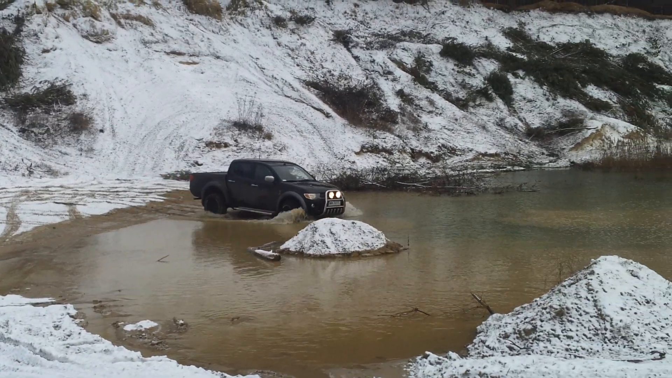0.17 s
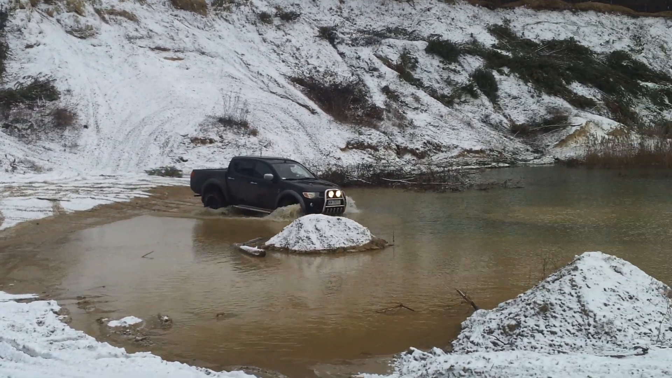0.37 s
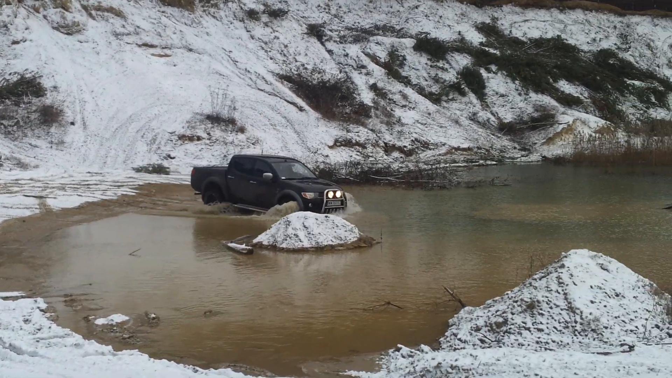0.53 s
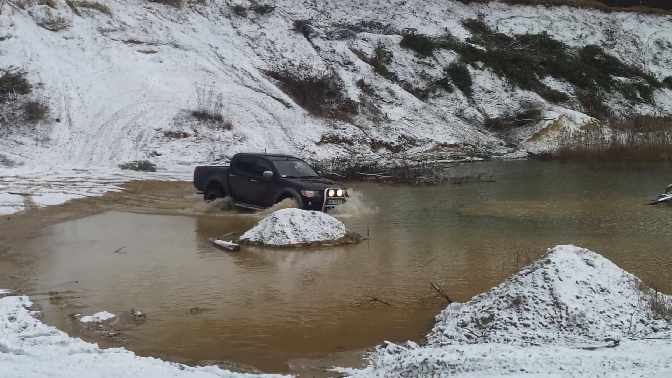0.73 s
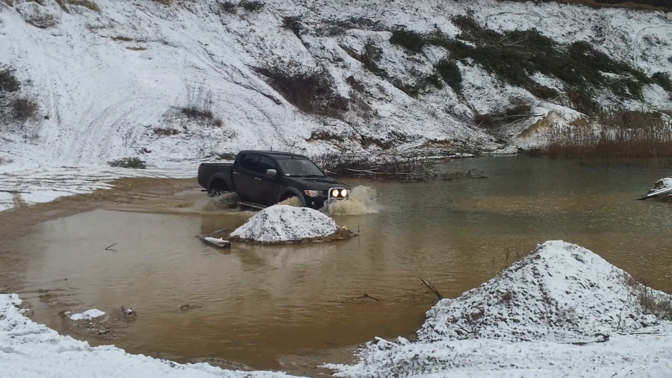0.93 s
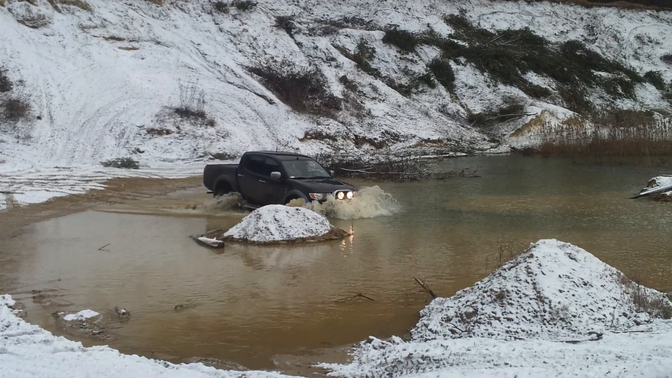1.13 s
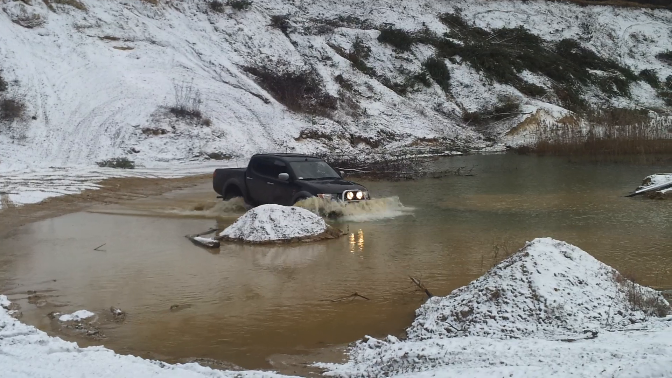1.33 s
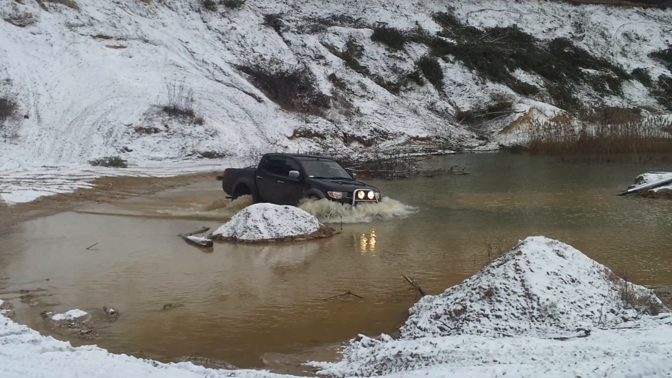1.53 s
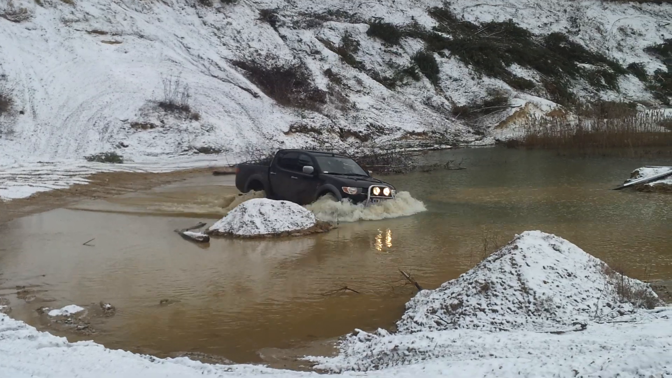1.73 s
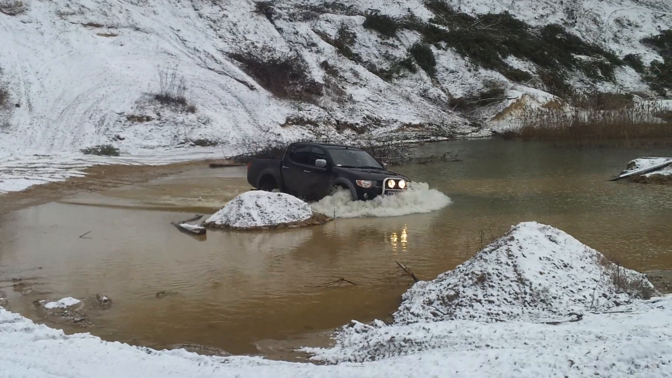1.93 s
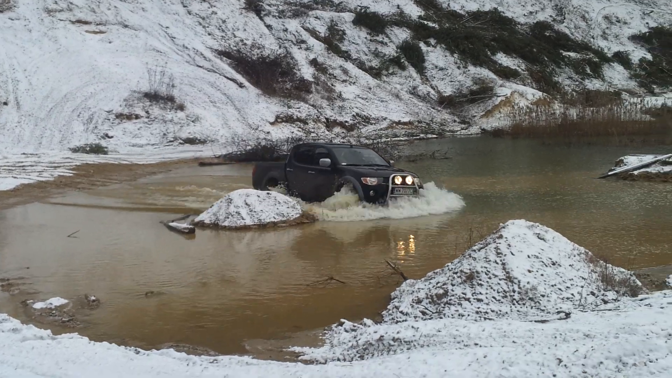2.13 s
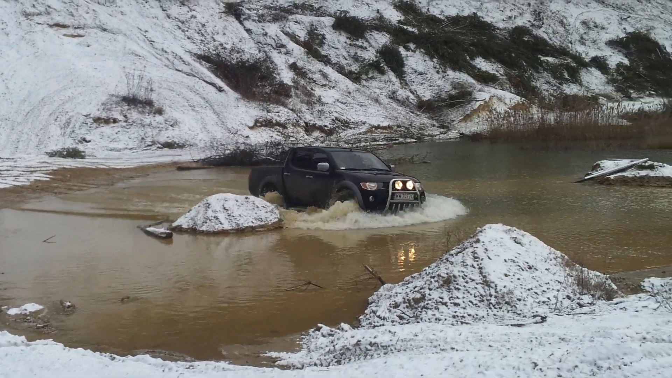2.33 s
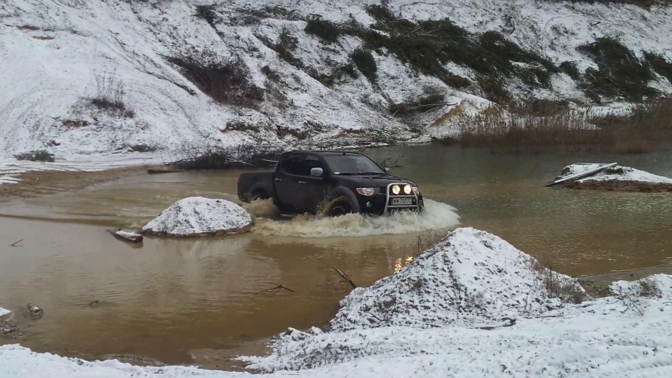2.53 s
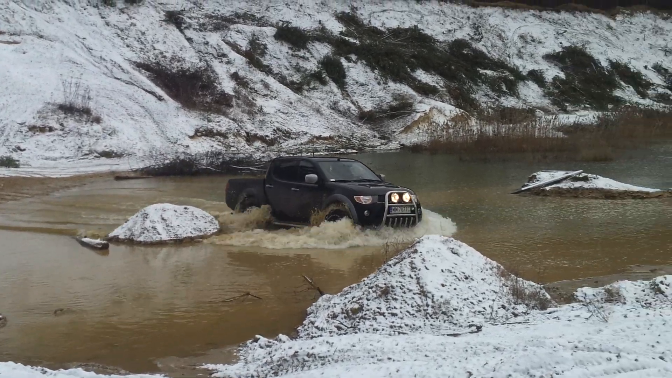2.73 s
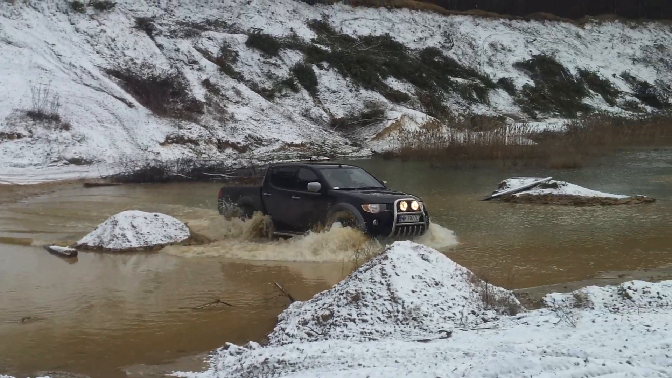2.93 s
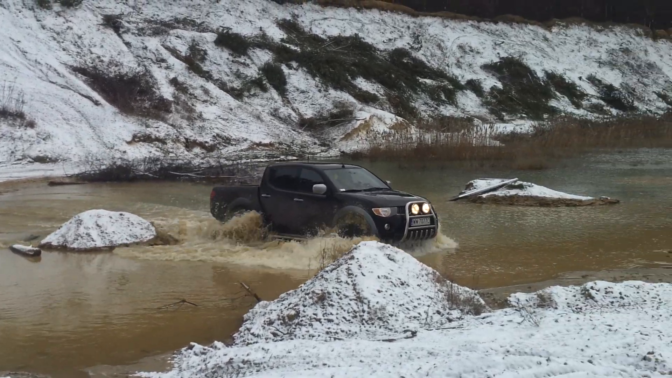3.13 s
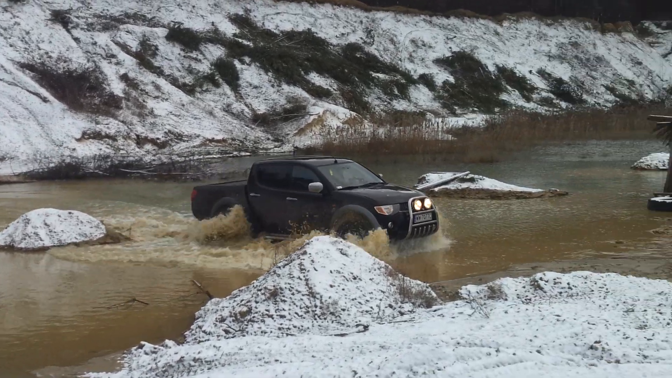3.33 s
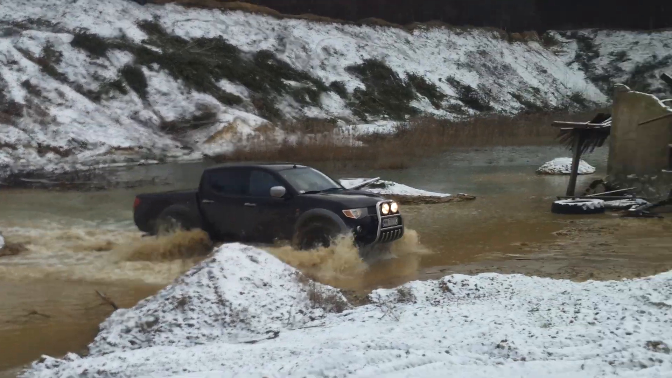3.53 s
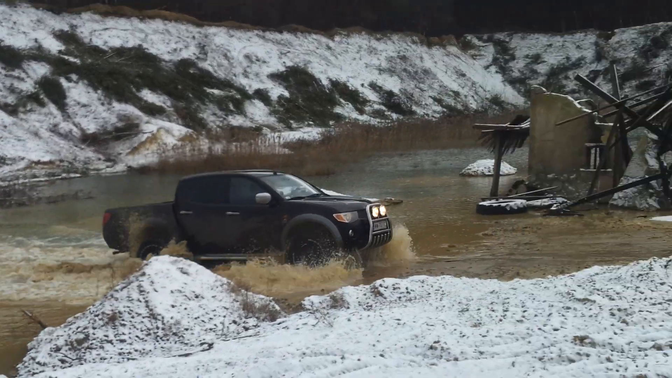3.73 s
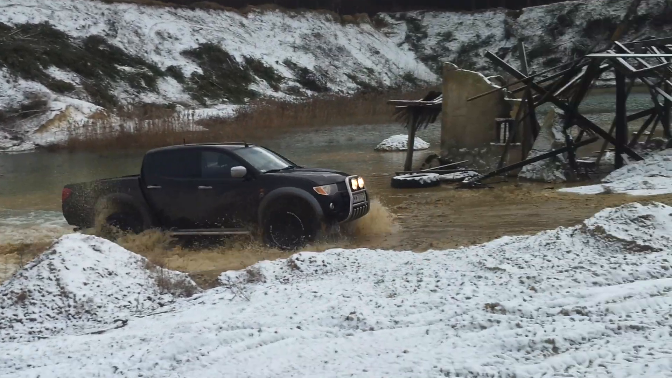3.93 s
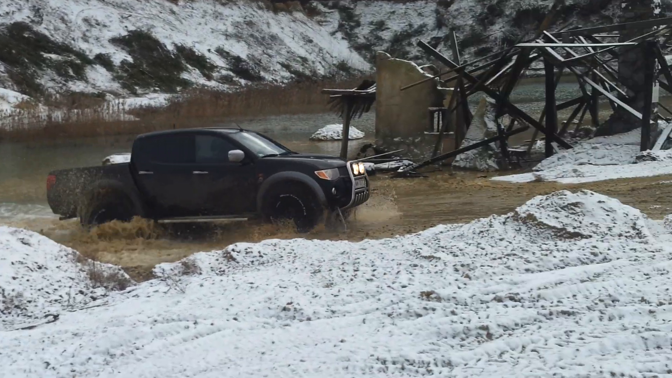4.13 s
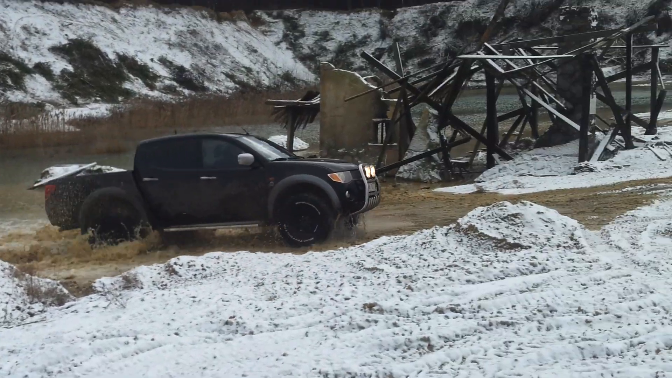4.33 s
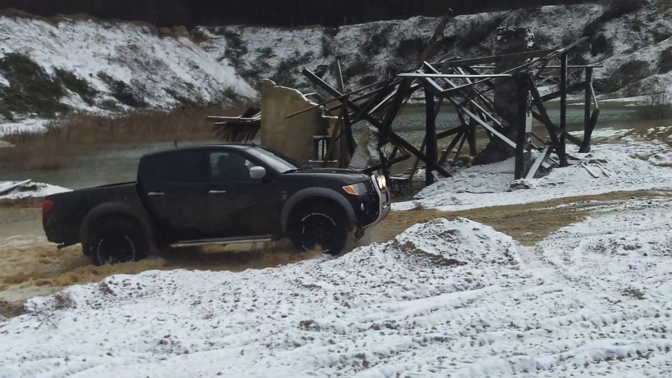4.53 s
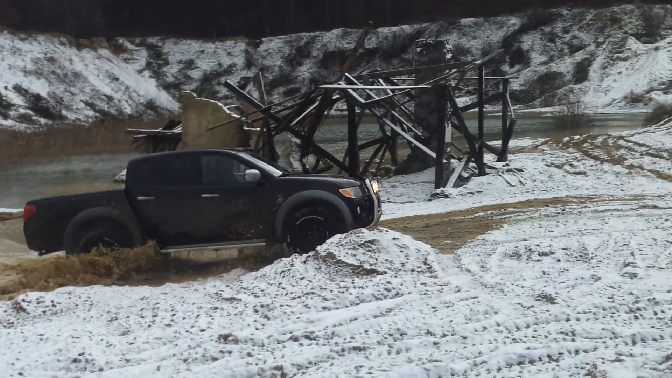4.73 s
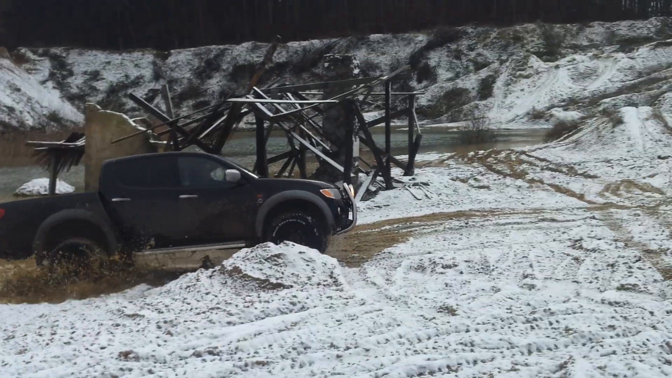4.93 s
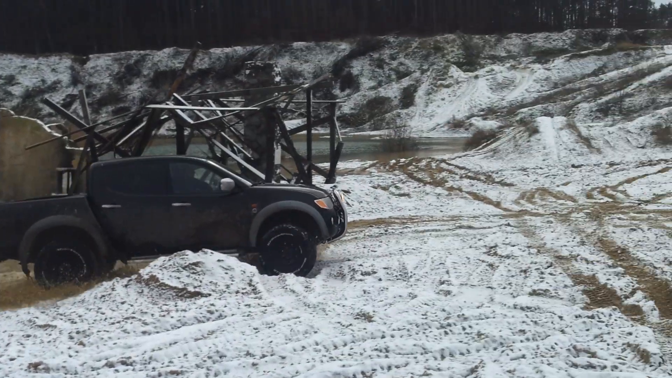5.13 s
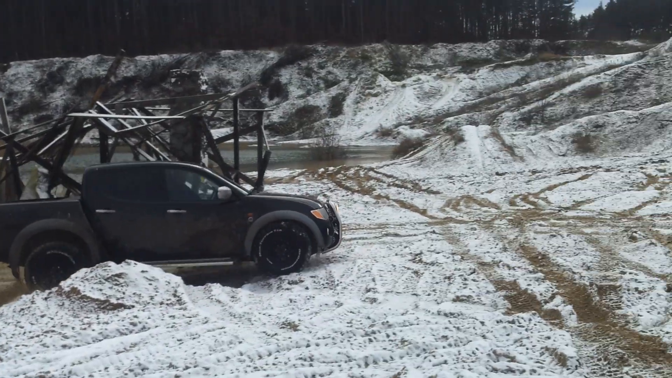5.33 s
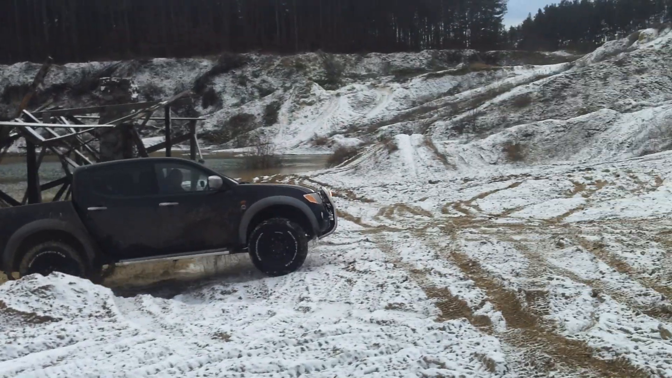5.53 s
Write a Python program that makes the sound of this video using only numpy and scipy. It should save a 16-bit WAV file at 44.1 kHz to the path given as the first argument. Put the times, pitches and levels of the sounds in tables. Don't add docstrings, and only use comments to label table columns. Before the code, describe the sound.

A low, booming engine drone and a wide wash of disturbed water start at moderate distance. After a quick gear shift the motor pulls up again, splashes and fine spray come closer, then ease as the truck leaves the water. Dull wind thumps and fluttering buffets interrupt midway and become rough and loud at the end. Basic camera microphone, open air, centred, coarse treble with little above the spray.

```python
import sys
import numpy as np
from scipy import signal
from scipy.fft import rfft, irfft, next_fast_len
from scipy.io import wavfile
from scipy.ndimage import uniform_filter1d

SR = 44100
rng = np.random.default_rng(int(sys.argv[2]) if len(sys.argv) > 2 else 0)


def elevation(decibels):
    levels = np.asarray(decibels, float)
    return 10 ** (levels / 20)


def materialize(psi):
    bounded = np.clip(np.atleast_2d(psi).T, -1, 1)
    quanta = np.round(bounded * 32767).astype(np.int16)
    wavfile.write(sys.argv[1], SR, quanta)


N = 250488
TIME = np.arange(N) / SR


def evened(x):
    return x / np.sqrt(np.mean(x ** 2) + 1e-20)


def column(table, index):
    rows = np.array(table)
    return np.interp(TIME, rows[:, 0], rows[:, index])


def bumps(rows, order=2):
    return sum(db * np.exp(-((TIME - s) / length) ** order) for s, length, db in rows)


def read(points, hz):
    f, value = np.transpose(points)
    return np.interp(np.log(hz + 1), np.log(f + 1), value, left=-90, right=-90)


def coloured(x, gain):
    size = next_fast_len(len(x))
    spectrum = rfft(x, size) * gain(np.fft.rfftfreq(size, 1 / SR))
    return irfft(spectrum, size)[:len(x)]


def noise(points, size, patch_db, flicker_db):
    hop, hz = size // 4, np.fft.rfftfreq(size, 1 / SR)
    a, b, patches = rng.standard_normal((N // hop + 5, len(hz), 3)).T
    patches = uniform_filter1d(patches, size=size // 48, axis=0)
    patches = evened(uniform_filter1d(patches, size=4096 // hop, axis=1))
    flicker = evened(uniform_filter1d(rng.standard_normal(a.shape[1]), size=max(1024 // hop, 1)))
    level_db = read(points, hz)[:, None] + patch_db * patches + flicker_db * flicker
    z = (a + 1j * b) * elevation(level_db)
    return evened(signal.istft(z, nperseg=size, noverlap=size - hop)[1][:N])


def drops(points, per_s, spread_db):
    clicks = rng.standard_normal(N) * (rng.random(N) < per_s / SR)
    clicks = clicks * elevation(spread_db * np.minimum(rng.exponential(1, N), 4))
    return evened(coloured(clicks, lambda hz: elevation(read(points, hz))))


# (time [s], firing rate [Hz], load heard at the camera [dB])
ENGINE_RUN = [(0, 85.8, -45.5), (.4, 89.65, -40.5), (.8, 96, -40), (1.05, 94.46, -40.5), (1.3, 88.4, -40.5),
              (1.43, 58.75, -40), (1.6, 55.1, -39), (1.85, 57.6, -39.5), (2.2, 61.3, -38.5),
              (2.45, 60.46, -37), (3.1, 75.2, -35), (3.35, 78.5, -32), (3.85, 84.1, -32), (4.1, 83, -35),
              (4.36, 86, -36.5), (4.8, 71.86, -35.5), (5.18, 66.9, -32.5), (5.68, 62.93, -27)]
# (frequency [Hz], tone over load [dB])
EXHAUST_PIPE = [(50, -13.5), (86, -15), (118, -15), (176, -14), (290, -16)]
# (middle time [s], half length [s], firing order [number], lift [dB])
PIPE_BOOMS = [(.2, .3, 1, 9.5), (.2, .27, 2, 13), (.7, .25, 3, 9), (1.074, .1, 2, 10), (1.3, 0.07, 3, 7),
              (1.55, .2, 1, 10), (1.903, 0.4, 2, 13.5), (2.4, .28, 1, 11.5), (2.9, 0.25, 1, 6),
              (2.45, 0.38, 3, 9), (2.65, .1, 2, 7.5), (3.1, 0.062, 2, 9), (3.85, .1, 3, 5),
              (4.253, .3, 2, 9), (4.24, .08, 2, 4.5), (4.55, 0.089, 1, 7), (4.799, 0.12, 3, 8.5),
              (5.199, .1, 1, 14), (5.4, 0.081, 2, 8), (5.658, .1, 1, 9.5)]
# (frequency [Hz], density [dB per Hz])
RUMBLE_COLOUR = [(30, -37), (70, -17.5), (120, -8.5), (180, -2), (250, -6), (350, -7.5), (500, -12.5),
                 (800, -21.5), (1200, -45)]


def engine():
    waver = uniform_filter1d(rng.standard_normal(N), size=1500)
    waver = evened(uniform_filter1d(waver, size=1500))
    firing_hz, load_db = column(ENGINE_RUN, index=1), column(ENGINE_RUN, index=2)
    turns = np.cumsum(firing_hz * (1 + .003 * waver)) / SR
    tones = 0
    for k in (1, 2, 3):
        booms = [(s, length, db) for s, length, order, db in PIPE_BOOMS if round(order) == k]
        tone_db = load_db + read(EXHAUST_PIPE, k * firing_hz) + bumps(booms, order=4)
        tones = tones + elevation(tone_db) * np.sqrt(2) * np.sin(2 * np.pi * k * turns + k)
    pulsing = evened(1 + 0.3 * np.cos(2 * np.pi * turns))
    rumble = elevation(load_db + 0.5) * noise(RUMBLE_COLOUR, size=2048, patch_db=1.0, flicker_db=-1.0)
    return tones + rumble * pulsing


# (time [s], thrown water [dB], bow wave [dB])
WATER_LEVELS = [(0, -37.5, -36.5), (.45, -40, -37), (.76, -40.5, -39), (1.35, -36.5, -37.5),
                (1.55, -37.5, -37), (1.87, -36, -35), (2.2, -36, -35), (2.6, -34.5, -36),
                (3.1, -34.5, -36.5), (3.5, -34.5, -36.5), (3.78, -29.5, -35), (3.95, -32.5, -35),
                (4.6, -32, -32.5), (4.68, -34.5, -33.5), (4.95, -37, -34.5), (5.2, -34, -33),
                (5.38, -37, -34.5), (5.68, -36.5, -33.5)]
# (time [s], length [s], spray lift [dB], mist lift [dB], wave lift [dB])
BODY_SLAPS = [(0.248, .025, 1, .3, 1), (.68, 0.032, .3, 4.5, 1), (1.061, 0.024, 1.5, 1.5, 0),
              (1.681, 0.026, 0, 4, 1), (1.733, 0.025, -3.5, -3, -3.5), (2.01, 0.056, -1.5, -0.5, 1.2),
              (2.125, .03, 1.5, 1.5, 0.7), (2.859, .03, 2, 1, 1), (3.161, 0.019, 1, 1.3, 5.5),
              (4.003, 0.012, -0.5, -2, -1), (4.187, .025, .3, 3, 0.2), (4.497, .015, 2.5, 0.5, .3),
              (4.576, 0.01, -1, 2.5, 2), (5.048, 0.0085, .3, 0.5, 5), (5.1, 0.12, 0.7, 2.5, 0.8),
              (5.306, .02, 5, 2.5, 4.5), (5.377, 0.032, -2, 0.5, -1), (5.454, 0.014, -1, 1, 5.5),
              (5.485, .02, 4, -0.5, -3.5), (5.543, 0.014, 3, -3, -3)]
# (frequency [Hz], density [dB per Hz])
SPRAY_COLOUR = [(2200, -15.5), (2410, -14), (2690, -5.5), (3170, 0), (3770, -0.5), (4650, -4), (6610, .5),
                (7600, -3), (8700, -8.5), (9900, -16.5), (10500, -21.5), (11200, -27), (11700, -25.5),
                (13000, -32)]
# (frequency [Hz], density [dB per Hz])
CHURN_COLOUR = [(250, -21.5), (450, 2), (700, -2.5), (1000, 1.5), (1400, -0.5), (1900, -3), (2250, -7),
                (2800, -18.5), (4000, -12.5)]


def water():
    spray = noise(SPRAY_COLOUR, size=512, patch_db=0.75, flicker_db=0.59)
    spray = spray + 0.32 * drops(SPRAY_COLOUR, per_s=2500, spread_db=4.0)
    mist = coloured(spray, lambda hz: 1 / (1 + (5300 / (hz + 1)) ** 8))
    churn = noise(CHURN_COLOUR, size=1024, patch_db=0.43, flicker_db=0.65)
    churn = churn + 0.22 * drops(CHURN_COLOUR, per_s=500, spread_db=1.5)
    slaps, thrown_db = np.array(BODY_SLAPS), column(WATER_LEVELS, index=1)
    spray_db, mist_db, wave_db = (bumps(slaps[:, [0, 1, k]]) for k in (2, 3, 4))
    coarse = elevation(thrown_db + spray_db + 0.3) * evened(spray - mist)

    mist_db = mist_db - 40 + 1.2364 * TIME + 1.2 * (thrown_db + 36.0)
    finest = coloured(mist, lambda hz: 1 / (1 + (7300 / (hz + 1)) ** 8))
    tail = elevation(bumps([(5.1, .3, 2.5)])) - 1
    fine = elevation(mist_db) * evened(mist + tail * finest)

    near = 1 / (1 + np.exp((3.7 - TIME) / .5))
    dull = coloured(churn, lambda hz: 1 / (1 + (hz / 1600) ** 4))
    churn = elevation(-1.5 * near) * dull + elevation(2.5 * near) * (churn - dull)
    wave = elevation(column(WATER_LEVELS, index=2) + wave_db + 2.0) * churn
    return coarse + fine + wave


def housing(x):
    echo_s, echo_share, echo_turns, fade_hz = 0.001657, 0.35, -0.16, 5100
    notch_hz, notch_width_hz, notch_share = 2208, 90, .35

    def ripple(hz):
        strength = echo_share / (1 + (hz / fade_hz) ** 4)
        return 1 + strength * np.exp(-2j * np.pi * (hz * echo_s + echo_turns))

    rippled = coloured(x, ripple)
    return coloured(rippled, lambda hz: 1 - notch_share / (1 + ((hz - notch_hz) / notch_width_hz) ** 2))


# (time [s], level [dB])
WIND_LEVEL = [(0, -53), (.3, -49.5), (1.25, -60), (1.5, -40), (1.62, -47.5), (1.95, -40), (2.1, -43.5),
              (2.5, -46.5), (2.9, -35), (3.2, -43.5), (3.5, -29.5), (3.62, -40), (3.88, -38.5),
              (4.12, -52.5), (4.78, -39), (4.87, -30), (5.05, -28.5), (5.68, -27.5)]
# (time [s], length [s], lift [dB])
WIND_PUFFS = [
    (.35, .06, 5),
    (2.65, .06, 5),
    (3.15, 0.055, -6),
    (4.3, .15, -3.5),
    (4.55, .06, 5),
    (4.73, 0.033, 4.5),
    (4.81, 0.023, -4),
    (5.05, 0.045, 2.5),
    (5.25, 0.055, -3.5),
    (5.5, .08, 2.5),
]
# (frequency [Hz], density [dB per Hz])
AIR_COLOUR = [(15, -14), (30, -8), (55, 8.5), (100, -3.5), (180, -7), (300, -22), (500, -39.5), (900, -58)]
# (frequency [Hz], density [dB per Hz])
FLUTTER_COLOUR = [(120, -11.5), (200, -3), (290, 0), (400, -8.5), (600, -22)]
# (start time [s], length [s], peak level [dB], eddy pitch [Hz])
WIND_GUSTS = [(1.497, 0.0033, -21, 176), (1.51, 0.0088, -20.5, 261), (1.53, 0.0021, -23, 197),
              (1.6, 0.0022, -23, 350), (1.93, 0.0052, -25, 301.7), (1.948, 0.01, -26, 180),
              (2.608, 0.0049, -24, 150), (3.144, 0.015, -14.5, 217), (3.15, 0.0021, -12, 477),
              (3.166, 0.009, -14.5, 373), (3.178, 0.0056, -12, 252), (3.186, 0.0031, -15.5, 460),
              (3.36, 0.0052, -19.5, 190), (3.408, 0.0038, -21, 213), (3.431, 0.0022, -15, 300),
              (3.454, 0.019, -15.5, 272.6), (4.845, 0.002, -18, 448), (4.855, 0.015, -14.5, 235.6),
              (4.917, 0.0038, -19.5, 327), (4.947, 0.008, -17, 286), (5.033, 0.0069, -17.5, 199.4),
              (5.152, 0.0038, -16.5, 220), (5.355, 0.0019, -10.5, 275), (5.397, 0.0016, -10, 476.3),
              (5.416, 0.0022, -10.5, 303), (5.528, 0.0019, -19, 189.6), (5.567, 0.0072, -12.5, 298),
              (5.579, 0.014, -6.5, 195), (5.654, 0.0035, -12.5, 360.5), (5.664, .015, -17, 292)]
# (start time [s], peak level [dB], eddy pitch [Hz])
WIND_THUMPS = [(1.506, -21, 75), (1.975, -19.5, 120), (3.339, -17, 89.9), (3.379, -12.5, 85.2),
               (3.425, -14, 78), (3.474, -14, 135), (4.871, -14, 59), (5.29, -16, 160),
               (5.318, -14.5, 59.6), (5.392, -9.5, 101.3), (5.483, -14.5, 136), (5.62, -20, 80),
               (3.152, -17, 140), (3.182, -23, 135), (3.161, -10.5, 440), (3.465, -21, 70),
               (3.508, -20.5, 189), (4.859, -23, 494), (5.172, -20, 79), (5.302, -24.5, 880),
               (5.411, -21, 600), (5.447, -23, 110), (5.572, -16.5, 560), (2.003, -24.5, 130),
               (2.93, -29, 380), (3.535, -22.5, 110), (5.372, -22, 480), (5.265, -23.5, 480)]


def wind():
    wind_db = column(WIND_LEVEL, index=1) + bumps(WIND_PUFFS)
    out = elevation(wind_db) * noise(AIR_COLOUR, size=1024, patch_db=0.9, flicker_db=2.0)
    t = np.arange(-1500, 1500) / SR
    thump_s = .004
    eddies = WIND_GUSTS + [(start, thump_s, peak_db, hz) for start, peak_db, hz in WIND_THUMPS]
    for (start, length, peak_db, hz), (phase, bend, beat) in zip(eddies, rng.random((len(eddies), 3))):
        wobble = 0.78 * np.sin(2 * np.pi * (0.4 * hz * t + bend))
        angle = 2 * np.pi * (hz * t + phase) + wobble
        uneven = elevation(2.5 * np.sin(2 * np.pi * (0.49 * hz * t + beat)) - 2.0)
        passing = np.exp(-(t / (.5 * length + 0.37 / hz)) ** 2)
        swings = np.cos(angle + 0.35 * np.cos(angle))
        eddy = elevation(peak_db) * passing * uneven * swings
        part = out[round((start + length / 2) * SR) - 1500:][:len(t)]
        part += eddy[:len(part)]
    flutter = noise(FLUTTER_COLOUR, size=512, patch_db=1.0, flicker_db=3.0)
    flutter_db = -40.0 + 1.5 * (wind_db + 30.0)
    return out + elevation(flutter_db) * flutter


def scene():
    mono = housing(engine() + water()) / 1.069 + wind()
    return np.array([mono, mono])


def coarse_camera(x):
    step_db, top_bin = -7.0, 552
    n, k = np.arange(2048) + .5, np.arange(top_bin) + .5
    window = np.sin(np.pi * n / 2048)[:, None]
    basis = window * np.cos(np.pi / 1024 * np.outer(n + 512, k)) / np.sqrt(512)
    padded = np.pad(x, (1022, 2048))
    bins = np.lib.stride_tricks.sliding_window_view(padded, 2048)[::1024].copy() @ basis
    power = uniform_filter1d((bins[:, 46:420] ** 2).mean(1), size=5)
    step = elevation(step_db) * np.sqrt(power)[:, None] + 1e-9
    whole = np.floor(abs(bins / step) ** .75 + .4054)
    frames = (np.sign(bins) * whole ** (4 / 3) * step) @ basis.T
    halves = frames[1:, :1024] + frames[:-1, 1024:]
    return np.pad(halves.ravel(), (2, 0))[:N]


def band_limit(x):
    return signal.sosfilt(signal.butter(12, 11870, fs=SR, output="sos"), x)


# (time [s], low edge [Hz], high edge [Hz], side over mid level [dB])
EAR_SPLITS = [
    (0.289, 4240.0, 5150.0, -4.2),
    (0.289, 6290.0, 8250.0, -3),
    (1.565, 5190.0, 6270.0, -6),
    (2.05, 4220.0, 5150, -3.2),
    (2.54, 4630, 6790, 1),
    (3.448, 6290.0, 7540.0, -2),
    (3.794, 4660, 5580, -2.6),
    (3.911, 5750, 6860, -3),
    (5.215, 5240, 6230, -4),
]


def record(dry):
    mid, side = coarse_camera(.6 * np.tanh(dry.mean(0) / .6)), np.zeros(N)
    window = np.hanning(2048)
    for s, low_hz, high_hz, side_db in EAR_SPLITS:
        at = round(s * SR / 1024 - .4) * 1024 - 1024 + 464
        unrelated = mid[at:at + 2048][::-1] * window
        band = coloured(unrelated, lambda hz: (hz > low_hz) & (hz < high_hz))
        side[at:at + 2048] += elevation(side_db) * band
    return band_limit(np.array([mid + side, mid - side]))


dry = scene()
out = record(dry)
materialize(out)
```